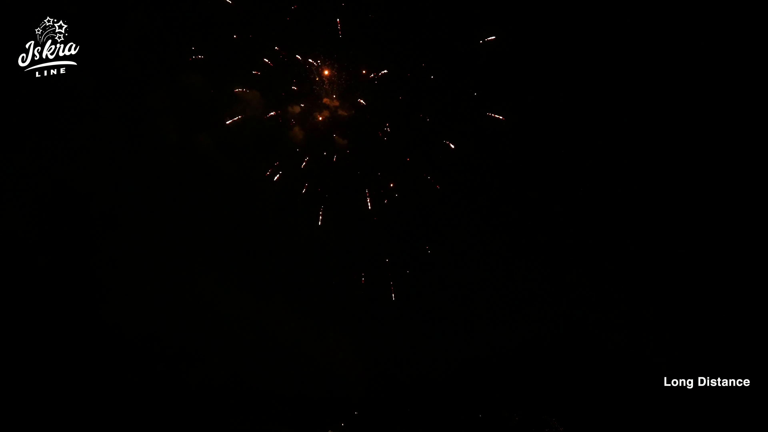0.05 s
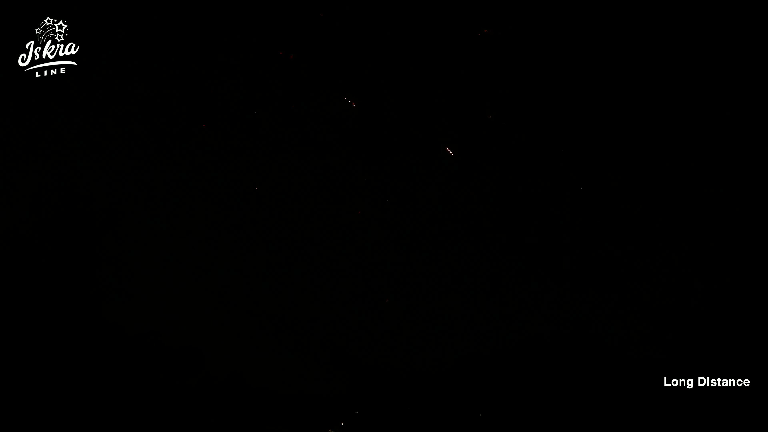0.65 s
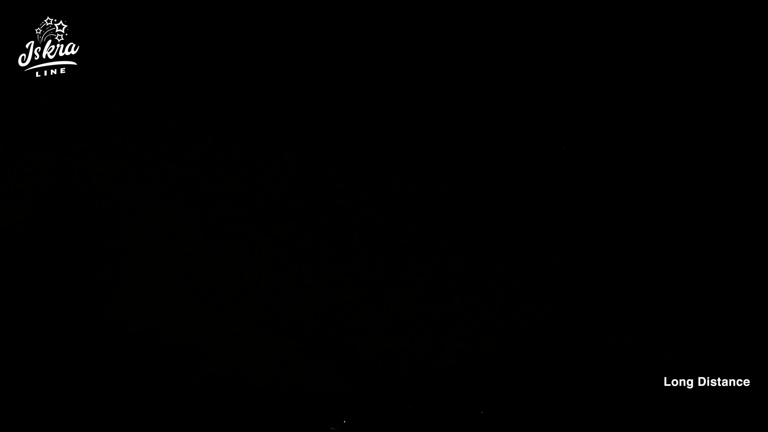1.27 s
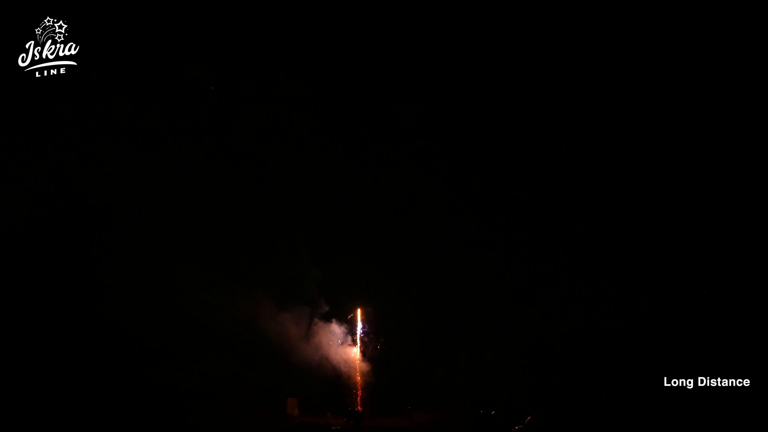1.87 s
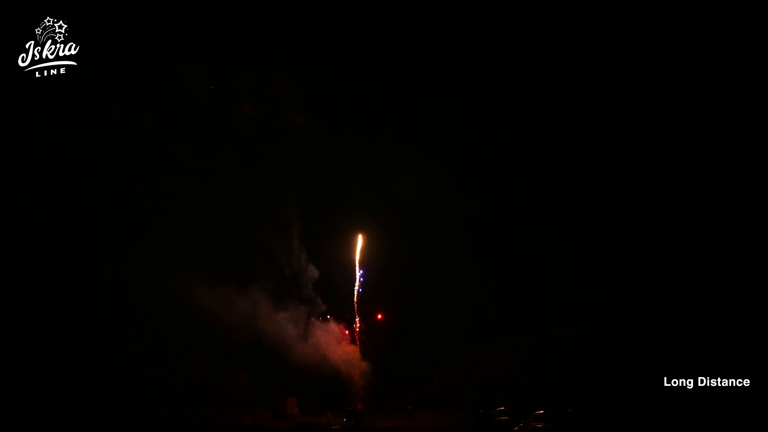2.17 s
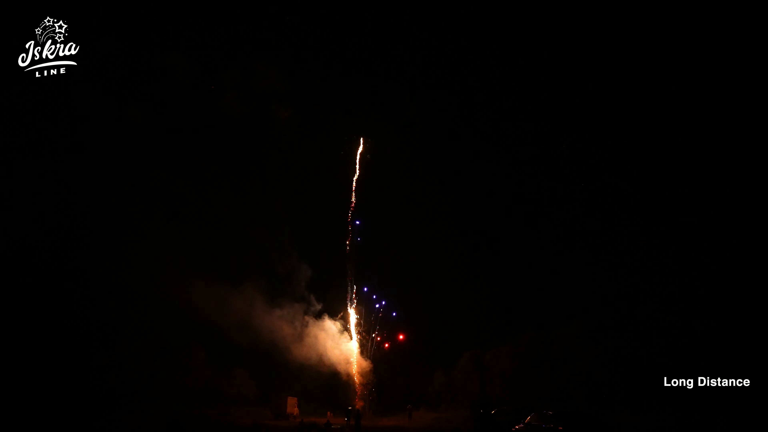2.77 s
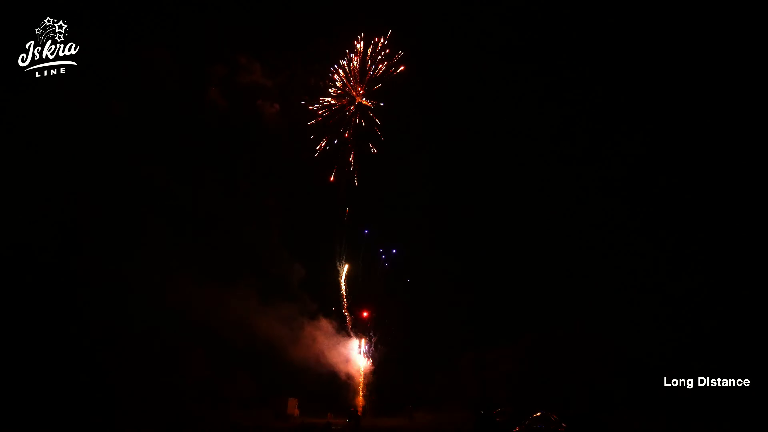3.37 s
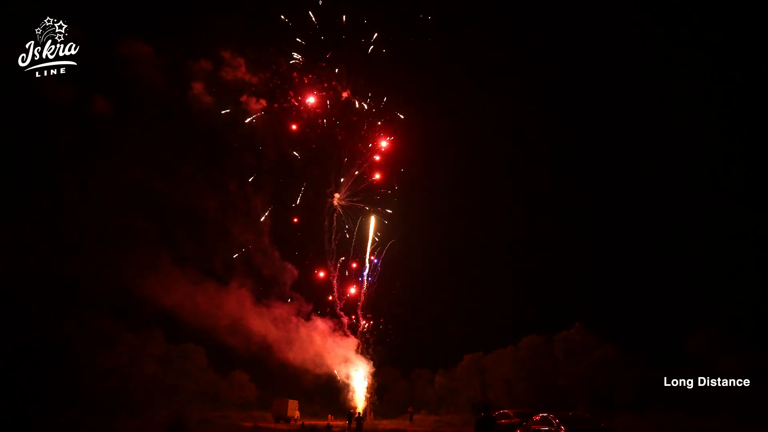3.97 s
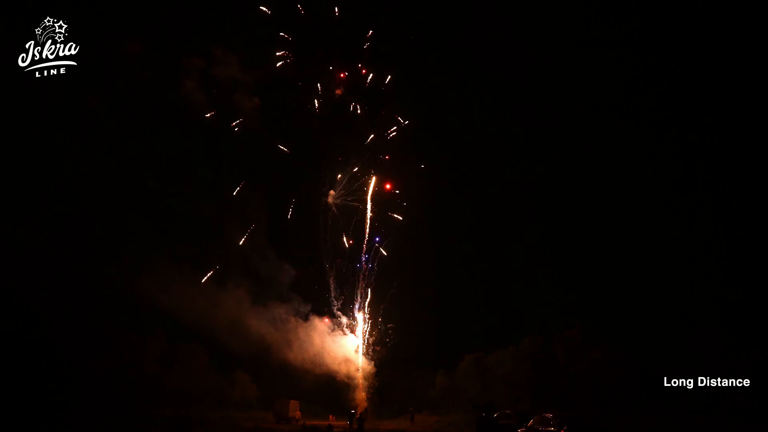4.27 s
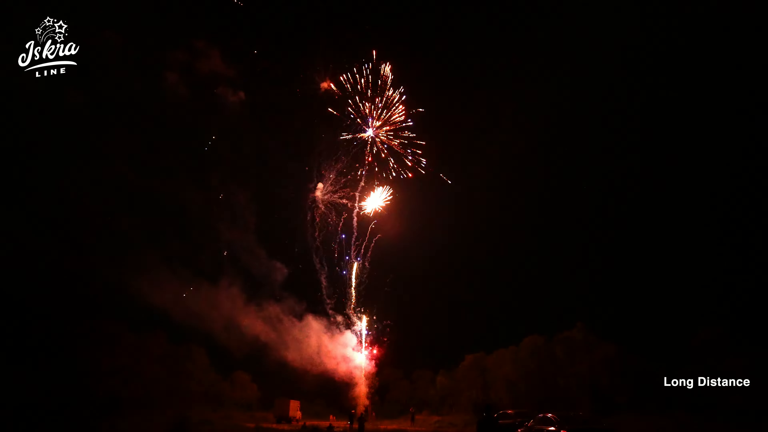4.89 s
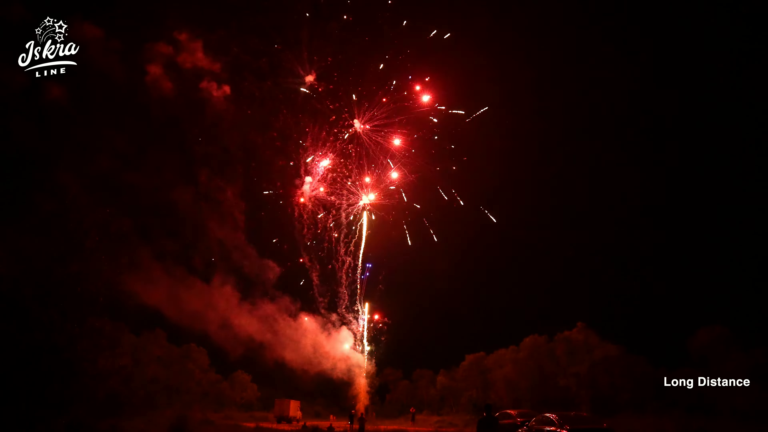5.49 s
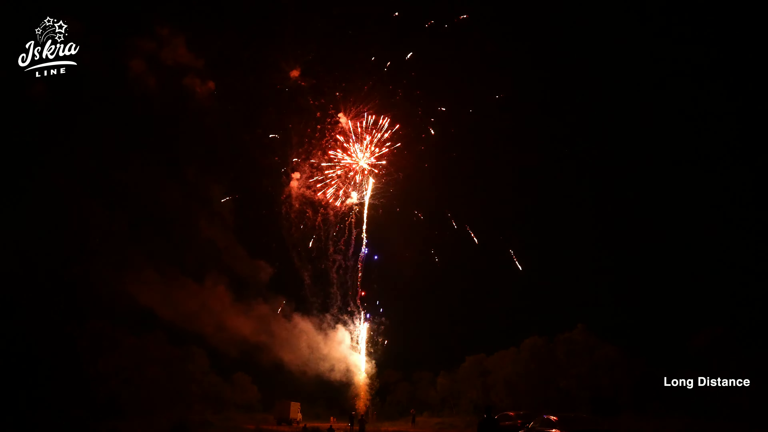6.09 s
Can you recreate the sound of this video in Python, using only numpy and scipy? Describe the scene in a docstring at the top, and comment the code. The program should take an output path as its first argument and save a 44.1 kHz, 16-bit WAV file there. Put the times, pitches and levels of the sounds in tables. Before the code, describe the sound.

Fireworks thump out of their tubes and bang overhead, echoing across a field, while an insect buzzes close by.

```python
"""A fireworks cake fires across a field at night: lift charges thump in the tubes, shells burst overhead.
Every blast rolls back from the surrounding trees. A bush cricket buzzes close by on the left,
over a low drone, insects in the grass and faint chirping.
The camera's limiter ducks the whole scene under each blast."""
import sys
import numpy as np
from scipy import signal
from scipy.fft import rfft, irfft, next_fast_len
from scipy.io import wavfile
from scipy.ndimage import uniform_filter1d, minimum_filter1d

SR = 44100
rng = np.random.default_rng(int(sys.argv[2]) if len(sys.argv) > 2 else 0)


def wav_record(signal):
    """Record a signal, one row per channel, as 16-bit PCM in the file named by sys.argv[1]."""
    frames = np.transpose(np.atleast_2d(signal))
    bounded = np.clip(frames, -1, 1)
    # unit amplitude maps onto the largest positive 16-bit level
    quanta = np.round(bounded * 32767).astype(np.int16)
    wavfile.write(sys.argv[1], SR, quanta)


N = 275164
TIME_S = np.arange(N) / SR

# blast echo off field and trees: freq_hz, density_db
TREE_ECHO_SPECTRUM = [(20, -10), (60, 4), (140, 4.5), (300, -4), (550, -7), (800, -10), (1200, -8.5),
                      (2500, -13), (5000, -11), (9000, -14.5), (15000, -19.5)]


def launches():
    """After a brief hiss the lift charge thumps and rings the tube; trees and forest answer."""
    # shells leaving their tubes: start_s, peak_db, hiss_db, echo_db
    shots = [(1.852, 15, -17, 0), (2.5398, 16, -16, -1.5), (3.4172, 12, -19, -2), (4.1395, 16, -11, 0),
             (4.8196, 13, -19, -1), (5.4327, 10, -14, -3), (6.0682, 16, -12, -.5)]
    # lift charge: freq_hz, density_db
    thump_spectrum = [(15, -26), (35, -4.5), (65, 1), (120, -4.5), (230, -7.5), (350, -16), (480, -23),
                      (700, -34.5), (1500, -33.5), (3000, -48), (14000, -44)]
    # hollow ring of the emptied tube: pitch_hz, level_re_thump_db, t60_s
    tube_modes = [(170, -40, .27), (237, -37.5, .3), (333, -39, .35), (410, -48, .2), (533, -51, .2)]
    # objects near the cake: delay_s, level_re_thump_db
    reflectors = [(0.0119, -19), (0.0248, -19.5), (0.0334, -30.5), (.0405, -26.5)]
    # echo off the field: freq_hz, density_db
    field_spectrum = [(20, -22), (55, 8.5), (135, 11), (210, -0.5), (330, -2.5), (600, -9), (1500, -9),
                      (3000, -10), (6000, -8.5), (10000, -10), (15000, -37)]
    hiss_lead_s, trees_s, forest_s = .0035, .08, .45
    out = np.zeros((2, N))
    thump = blast(thump_spectrum, swing_hz=15)
    far_thud = lowpass(thump, 90)
    age_s = np.arange(SR // 2) / SR
    ring = sum(amp(db - 60 * age_s / t60_s) * np.sin(2 * np.pi * hz * age_s)
               for hz, db, t60_s in tube_modes)
    hiss_age = np.arange(SR // 100) / SR / hiss_lead_s
    hiss_envelope = np.sqrt(hiss_age) * amp(-hiss_age ** 4)
    for start_s, peak_db, hiss_db, echo_db in shots:
        hiss = hiss_envelope * rng.standard_normal((2, len(hiss_age)))
        add(out, start_s - hiss_lead_s, amp(hiss_db) * hiss)
        add(out, start_s, amp(peak_db) * thump)
        add(out, start_s, amp(peak_db) * ring)
        for delay_s, level_db in reflectors:
            add(out, start_s + delay_s, amp(peak_db + level_db) * thump)
        field = roll(field_spectrum, rise_s=.032, early=.6, t60_scale=.66, grain_db=2.5, size=SR)
        trees = roll(TREE_ECHO_SPECTRUM, rise_s=.0028, early=.22, t60_scale=.17, grain_db=4, size=SR // 3)
        add(out, start_s, amp(echo_db - 17.5) * field)
        add(out, start_s + trees_s, amp(echo_db - 23) * trees)
        add(out, start_s + forest_s, amp(peak_db - 37.5) * far_thud)
    return out


def bursts():
    """An overhead shock bounces off the ground, slaps off trees, returns from the forest, rolls away."""
    # shell bursts, the first before time zero: start_s, level_db, crack_hz, echo_db, bounce_s, slap_s
    shells = [(-.58, 25, 2000, -1, .003, .08), (3.4743, 27, 1800, -0.5, 0.0043, 0.0885),
              (3.739, 27, 1119, 1, 0.0031, 0.068), (5.0259, 26.5, 4090, -0.5, 0.00415, 0.072),
              (5.1683, 25.5, 1182, 1, 0.0033, 0.071)]
    # shock wave: freq_hz, density_db
    bang_spectrum = [(8, -6), (20, 0.5), (60, 1), (200, -2), (500, -10.5), (1000, -22), (2500, -30),
                     (4500, -57), (6500, -24), (15000, -62)]
    # forest rumble: freq_hz, density_db
    forest_spectrum = [(20, -10.5), (65, 4.5), (140, -4), (280, -28), (550, -15), (1100, -18), (6000, -81)]
    # last roll from far across the land: freq_hz, density_db
    far_spectrum = [(30, -11), (70, 6.5), (150, 2.5), (240, -6), (360, 1.5), (590, 3.5), (760, -10),
                    (1050, -5), (1400, -11.5), (1800, -12.5), (2400, -15), (3200, -27), (5000, -20.5)]
    forest_s, crack_t60_s = .426, .021
    out = np.zeros((2, N))
    bang = blast(bang_spectrum, swing_hz=238)
    dull_bang = lowpass(bang, 620)
    age_s = np.arange(SR // 50) / SR
    for start_s, level_db, crack_hz, echo_db, bounce_s, slap_s in shells:
        # short noisy crack at the front of each bang
        crack = lowpass(lowpass(rng.standard_normal(len(age_s)), crack_hz), crack_hz / 2)
        add(out, start_s, amp(level_db + 1.5 - 60 * age_s / crack_t60_s) * crack)
        add(out, start_s, amp(level_db) * lowpass(bang, crack_hz))
        add(out, start_s + bounce_s, amp(level_db - 6) * lowpass(bang, 860))
        add(out, start_s + slap_s, amp(level_db - 28.5) * dull_bang)
        add(out, start_s + forest_s, amp(level_db - 34) * dull_bang)
        trees = roll(TREE_ECHO_SPECTRUM, rise_s=.14, early=1, t60_scale=1.146, grain_db=.5,
                     size=3 * SR // 2)
        forest = roll(forest_spectrum, rise_s=.051, early=.46, t60_scale=.7, grain_db=2.5, size=SR)
        far = roll(far_spectrum, rise_s=.3, early=.12, t60_scale=4.31, grain_db=1.5, size=3 * SR)
        add(out, start_s, amp(echo_db - 10.5) * trees)
        add(out, start_s + forest_s, amp(echo_db - 19) * forest)
        add(out, start_s, amp(echo_db - 25.5) * far)
    return out


def blast(spectrum, swing_hz, size=16384):
    """Causal two-way pressure pulse of peak 1, reaching the right microphone first."""
    hz = np.fft.rfftfreq(size, 1 / SR)
    cepstrum = irfft(np.log(amp(along(spectrum, hz))))
    minimum_phase = np.exp(rfft(2 * cepstrum[:size // 2], size))
    allpass = (swing_hz - 1j * hz) / (swing_hz + 1j * hz)
    pulse = irfft(minimum_phase * allpass)[:size // 2]
    pulse /= np.abs(pulse).max()
    lag_samples = 5
    return np.array([np.pad(pulse, (lag_samples, 0)), np.pad(pulse, (0, lag_samples))])


def roll(spectrum, rise_s, early, t60_scale, grain_db, size):
    """Dense echoes off grass, trunks and leaves: build from gain `early`, then die, treble first."""
    # decay over the field: freq_hz, base_t60_s
    decay = [(60, 2.1), (200, 1.1), (500, 1.46), (1200, 1.81), (2500, 1.45), (5000, 1.06), (12000, 0.58)]
    noise = diffuse(spectrum, size)
    echoes = unit(noise * amp(grain_db * wobble(350, size) + 1.16 * wobble(30, size)))
    hz, age_s, bands = signal.stft(echoes, SR, nperseg=512)
    fade = amp(-60 * age_s / (t60_scale * along(decay, hz)[:, None]))
    tail = signal.istft(bands * fade, nperseg=512)[1][:, :size]
    build = 1 - (1 - early) / (1 + (np.arange(size) / SR / rise_s) ** 4)
    return tail * build


def bush_cricket():
    """Fast falling chirps through the wing resonance: direct on the left, grass scatter on both sides."""
    pace_hz, drift, jitter = 195.65, .0011, .0028
    from_hz, to_hz, sweep_s, edge_s = 15800, 8700, .0028, .0006
    wing_hz, wing_width_hz = 11700, 4000
    direct_db, grass_left_db, grass_right_db, grass_t60_s = -16.8, -26, -33, .035
    rate_hz = pace_hz * (1 + drift * wobble(2) + jitter * wobble(pace_hz))
    pulses = np.cumsum(rate_hz) / SR
    age_s = pulses % 1 / rate_hz
    fall_per_s = np.log(from_hz / to_hz) / sweep_s
    pitch_hz = from_hz * np.exp(-fall_per_s * age_s)
    turns = (from_hz - pitch_hz) / fall_per_s
    detune = 1 + .0051 * rng.standard_normal(2 * SR)[pulses.astype(int)]  # one value per chirp
    stroke = np.sin(np.pi / 2 * np.clip(np.minimum(age_s, sweep_s - age_s) / edge_s, 0, 1)) ** 2
    wing = 1 / np.hypot(1, 2 * (pitch_hz - wing_hz) / wing_width_hz)
    song = unit(stroke * wing * np.sin(2 * np.pi * detune * turns))
    song *= amp(.085 * wobble(7) + .72 * wobble(180))
    delay_s = np.arange(SR // 25) / SR
    grass = rng.standard_normal((2, len(delay_s))) * amp(-60 * delay_s / grass_t60_s)
    left, right = signal.fftconvolve(song[None], grass, axes=1)[:, :N]
    return np.array([amp(direct_db) * song + amp(grass_left_db) * unit(left),
                     amp(grass_right_db) * unit(right)])


def night_drone():
    """Low far-off drone with faint hiss."""
    # night air: freq_hz, density_db
    spectrum = [(20, -17.5), (45, -4), (58, -9), (66, 6), (76, -12.5), (95, -13.5), (160, -19), (300, -28),
                (500, -26), (1000, -41), (2400, -48), (4200, -35.5), (5500, -45), (8000, -34),
                (15000, -26.5)]
    return amp(-30.5 + .95 * wobble(11)) * diffuse(spectrum, N)


def grass_insects():
    """High hiss of insects in the grass, easing off early on."""
    # insect chorus: freq_hz, density_db
    spectrum = [(5000, -67), (7500, -24), (9000, 3), (10300, 3), (12000, -1), (14000, -10), (15500, 3)]
    return amp(np.interp(TIME_S, [.7, 1.3], [-30.5, -37])) * diffuse(spectrum, N)


def faint_chirps():
    """Faint narrow-band chirping near 3.3 kHz, unevenly paced."""
    # chirp band: freq_hz, density_db
    spectrum = [(2700, -50), (3100, 16), (3300, 22), (3500, 18.5), (3900, -60)]
    beats = np.cumsum(9 * (1 + .42 * wobble(9.3))) / SR
    bouts = np.clip(1.8 + .5 * wobble(5.9), 0, 1)
    return amp(-50) * bouts * np.sin(np.pi * beats) ** 4 * diffuse(spectrum, N)


def diffuse(spectrum, size):
    """Stereo noise from all around at rms 1: alike in the bass, less so in the treble."""
    # left-right likeness: freq_hz, correlation
    likeness = [(100, 1), (250, 0.98), (500, 0.7), (1000, 0.43), (2000, 0.071), (4000, -0.36), (10000, 0.5)]
    fft_size = next_fast_len(size, real=True)
    hz = np.fft.rfftfreq(fft_size, 1 / SR)
    correlation = along(likeness, hz)
    white = rng.standard_normal((2, len(hz), 2)).view(complex)[..., 0]
    coloured = white * amp(along(spectrum, hz))
    mid, side = irfft(coloured * np.sqrt([1 + correlation, 1 - correlation]), fft_size)[:, :size]
    return unit(np.array([mid + side, mid - side]))


def amp(db):
    """Decibels to gain."""
    return 10 ** (np.asarray(db) / 20)


def unit(x):
    """x at rms 1."""
    return x / np.sqrt(np.mean(x ** 2) + 1e-20)


def along(points, hz):
    """Interpolate (freq_hz, value) points on a log axis."""
    freq_hz, values = np.transpose(points)
    return np.interp(np.log(hz + 1), np.log(freq_hz), values)


def wobble(rate_hz, size=N):
    """Random curve of rms near 1, knots at rate_hz."""
    knots = rng.standard_normal(int(size * rate_hz / SR) + 2)
    return 1.24 * np.interp(np.arange(size) * rate_hz / SR, np.arange(len(knots)), knots)


def filtered(x, response):
    """Apply a complex frequency response."""
    size = x.shape[-1]
    fft_size = next_fast_len(size + SR // 4)
    return irfft(rfft(x, fft_size) * response(np.fft.rfftfreq(fft_size, 1 / SR)), fft_size)[..., :size]


def lowpass(x, corner_hz):
    """One-pole low-pass."""
    return filtered(x, lambda hz: 1 / (1 + 1j * hz / corner_hz))


def add(track, start_s, sound):
    """Mix a sound in at start_s, cut to the track."""
    start = round(start_s * SR)
    part = sound[..., max(-start, 0):max(N - start, 0)]
    track[..., max(start, 0):max(start, 0) + part.shape[-1]] += part


def limiter(x, ceiling_db, hold_s, release_s, slow_share, slow_release_s):
    """Gain drops at once under a peak, holds, then recovers fast, the last few dB slowly."""
    over_db = np.maximum(20 * np.log10(np.abs(x).max(axis=0) + 1e-9) - ceiling_db, 1e-9)
    decay = TIME_S / release_s
    fast_db = np.exp(np.maximum.accumulate(np.log(over_db) + decay) - decay)  # exponential release
    held_db = np.maximum(fast_db, np.interp(TIME_S - hold_s, TIME_S, fast_db))
    step = 1 / (slow_release_s * SR)
    slow_db = slow_share * signal.lfilter([step], [1, step - 1], held_db)
    gain_db = minimum_filter1d(-np.maximum(held_db, slow_db), size=13)
    return x * amp(uniform_filter1d(gain_db, size=13))


def scene():
    """Everything reaching the two microphones."""
    return launches() + bursts() + bush_cricket() + night_drone() + grass_insects() + faint_chirps()


def record(dry):
    """The camera limits the blasts and cuts the top treble."""
    limited = limiter(dry, ceiling_db=-.93, hold_s=.006, release_s=.025, slow_share=.69,
                      slow_release_s=.13)
    return filtered(limited, lambda hz: hz < 15850)


dry = scene()
out = record(dry)
wav_record(out)
```